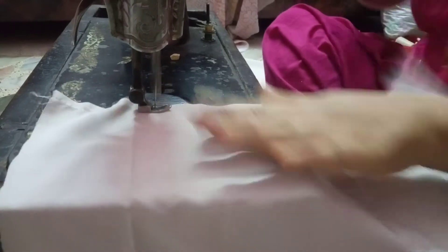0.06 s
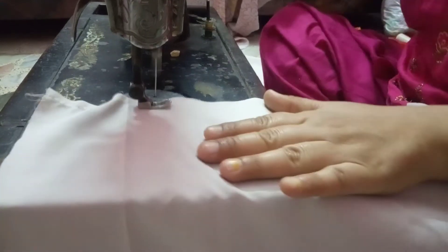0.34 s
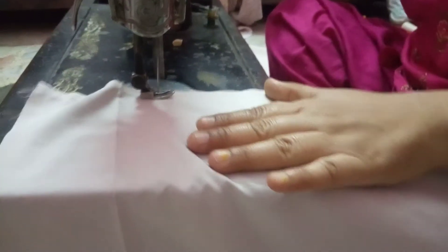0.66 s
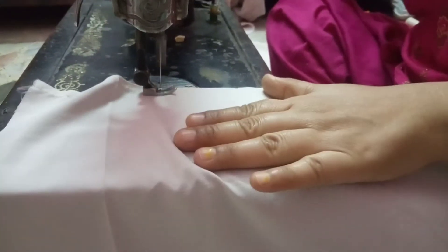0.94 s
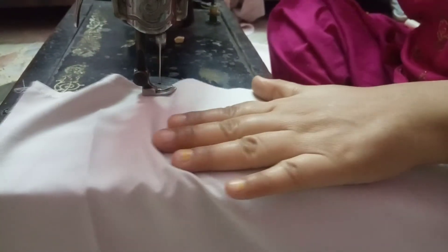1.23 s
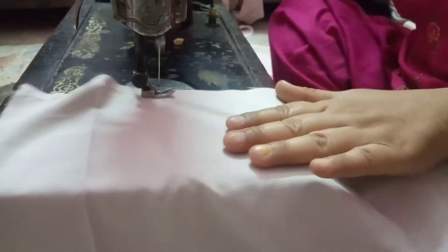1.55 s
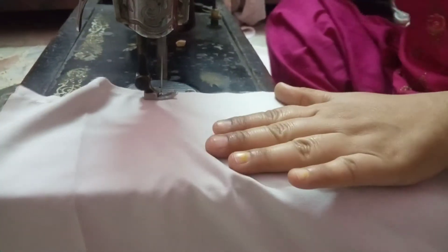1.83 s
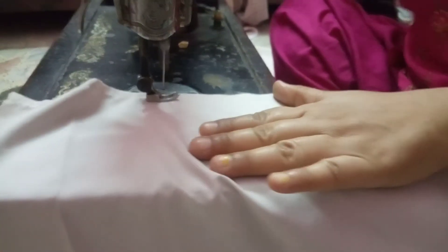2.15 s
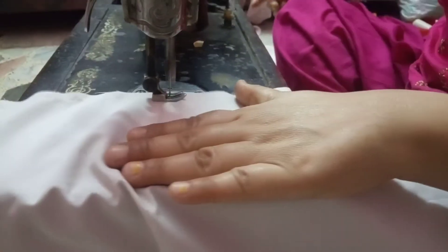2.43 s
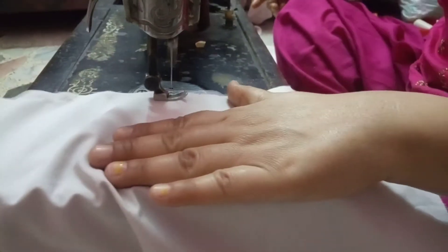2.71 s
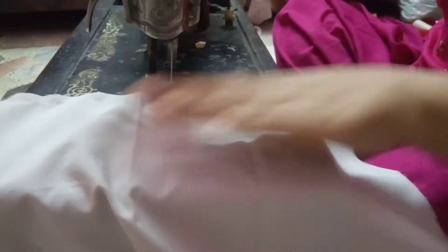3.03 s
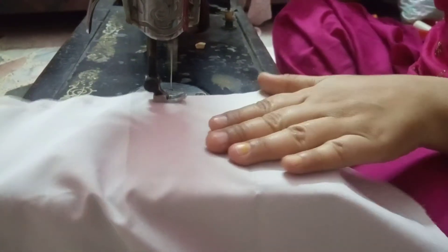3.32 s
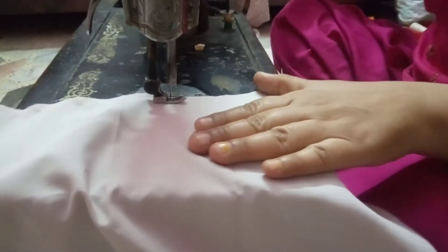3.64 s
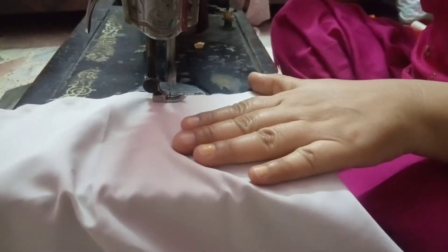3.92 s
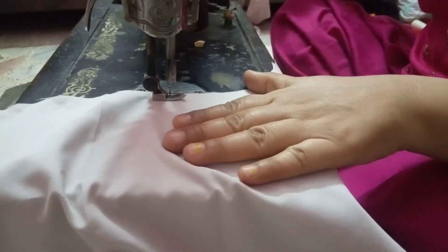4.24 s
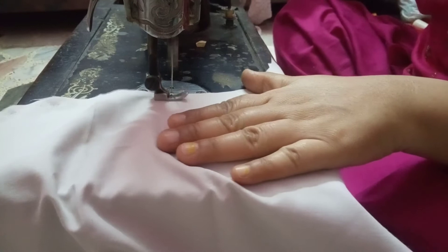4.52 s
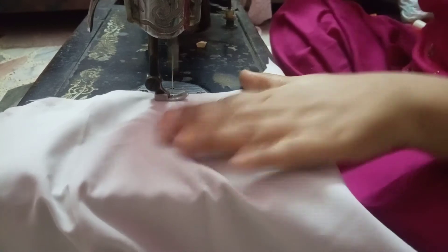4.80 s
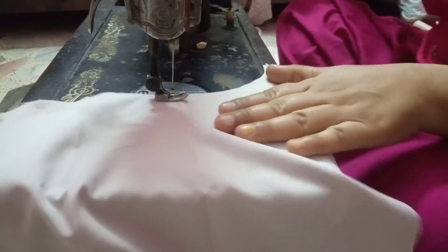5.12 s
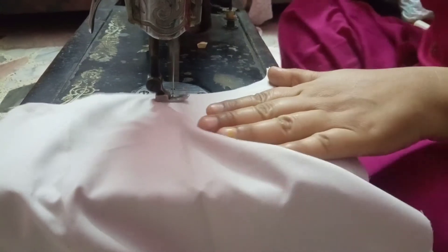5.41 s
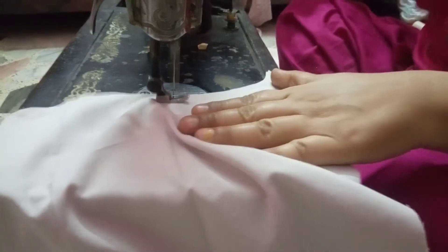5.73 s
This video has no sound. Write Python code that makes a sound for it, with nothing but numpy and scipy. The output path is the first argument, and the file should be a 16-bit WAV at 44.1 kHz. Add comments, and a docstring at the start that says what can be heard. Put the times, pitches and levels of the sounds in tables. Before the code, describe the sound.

An old iron sewing machine is already running, heard close by in a small room with a little reverberation. For about six seconds it ticks rapidly, around eight stitches a second, over a continuous rattle and the low rumble of its wooden table. Many stitches carry a light steel ping, and thin metallic chirps come and go. A clack with a high ring comes at about 1.1 seconds. The machine quickens toward 2 seconds, and the sound cuts out for an instant at 2.1, returning with a clack. The table thuds softly around 2.6 seconds, and another clack follows at 3. The pace eases between about 3.5 and 5 seconds, then picks up again. Hard clacks with a short metallic buzz land at about 4.7, 5.1 and 5.4 seconds. The table thuds again near 5.8 as the stitching continues.

```python
"""Ticking, rattling stitches of an old iron sewing machine on its wooden table, close by in a small room.
Each turn of the wheel plays one round of ticks and pings a steel part, often faintly. The works rumble
and rattle with the speed, thin metallic chirps come and go, the table thuds, and now and then a hard
clack sets the head buzzing. The sound cuts out once for a moment."""
import sys
import numpy as np
from scipy import signal
from scipy.fft import rfft, irfft
from scipy.io import wavfile
from scipy.ndimage import uniform_filter1d

SR = 44100
rng = np.random.default_rng(int(sys.argv[2]) if len(sys.argv) > 2 else 0)


def inscribe(sig):
    """Save sig as 16-bit PCM at rate SR to the path in sys.argv[1].

    A 1-D sig is mono; a 2-D sig holds one channel per row.
    Samples are clipped to [-1, 1] before scaling.
    """
    pcm = np.round(np.clip(np.atleast_2d(sig).T, -1, 1) * 32767)
    wavfile.write(sys.argv[1], SR, pcm.astype(np.int16))


N = 258426
TIME = np.arange(N) / SR
USUAL_TURNS_PER_S = 8

# one stitch per wheel turn: t/s, mid-turn lag/turn, tick force/dB, ping/dB
STITCHES = [(-0.085, 0.034, 5, -25), (0.041, 0, 0, -24), (0.1755, -0.042, -3, -0.5),
            (0.2977, -0.0057, -2, -0.5), (0.432, 0.033, -4.5, -24), (0.5561, 0.043, -0.5, -6),
            (0.7223, 0.043, -1.5, 0), (0.8954, 0.012, -0.5, -7.5), (1.0271, -0.013, -3, -2),
            (1.19, 0.012, 0, -17), (1.342, -0.019, -3, -28), (1.482, 0.017, -0.5, -20),
            (1.606, .016, 1, -18), (1.713, -0.024, 3.5, -24), (1.8282, -.02, -1.5, 2),
            (1.923, 0.025, 1, -15), (2.017, 0.0052, 2.5, -21), (2.116, 0, 3.5, -26), (2.2414, 0, -9, 0),
            (2.3361, 0.0017, -2, -1.5), (2.427, -.02, 2, -13), (2.5321, -0.039, -2.5, -0.5),
            (2.6299, 0.028, 3, 1.5), (2.742, -.005, 1, -16), (2.8594, -0.01, 0, -1),
            (2.9711, 0.014, 1, 1.5), (3.093, -0.014, 1, -16), (3.2221, -0.014, -0.5, -3),
            (3.3418, 0.025, 1, 2), (3.48, -0.012, 1, -17), (3.6212, -0.012, -1, 0),
            (3.7539, 0.0096, -2.5, -2.5), (3.905, 0, -1, -20), (4.0602, -0.011, 1.5, -1.5),
            (4.2248, -0.021, -1, -1), (4.385, -0.052, -0.5, -25), (4.593, -0.019, 2.5, -2),
            (4.75, 0.0015, 1, -36), (4.895, -0.0021, 0.5, -25), (5.04, .035, 3, -22),
            (5.172, 0.0054, 2, -20), (5.294, 0, 0.5, -29), (5.4076, -0.036, 5, 0.5), (5.523, .008, 3, -18),
            (5.626, 0.023, 3, -21), (5.7234, .025, 0.5, 3), (5.828, 0.0064, -6, -18), (5.93, 0, 0, -17)]
# hard clacks, relative levels: t/s, crack/dB, buzz/dB, buzz t60/s, buzz f/Hz, frame clang/dB,
# table thump/dB, splash/dB, ping/dB
CLACKS = [(1.1412, -37, -40.5, 0.34, 5570, -39, -44.5, -35, 6.5),
          (1.85, -28, -39, 0.26, 5750, -39, -62, -50, -15),
          (2.256, -33, -25, 0.051, 4960, -30, -32, -38.5, -23),
          (2.2726, -32, -31, 0.02, 5300, -38, -53, -50, -24),
          (3.057, -27, -44.5, 0.4, 4670, -47, -62, -54, -22),
          (4.6501, -26, -41.5, 0.31, 6000, -43, -41.5, -48, -23),
          (5.0613, -18.5, -41, 0.43, 5900, -45.5, -53, -49, -23),
          (5.4399, -15.5, -38, 0.51, 5350, -44.5, -49, -52, -20)]
# spectra of table rumble and bright snap: f/Hz, level/dB
RUMBLE_SPECTRUM = [(50, -46.5), (95, -20.5), (125, -0.5), (200, 2.5), (290, -2.5), (380, -1.5), (620, -5),
                   (850, -19.5), (1500, -14.5), (4000, -59.5)]
SNAP_SPECTRUM = [(4000, -30.5), (8000, 3.5), (11500, 9.5), (14000, 0.5), (16000, -1.5)]


def amp(db):
    return 10 ** (np.asarray(db) / 20)


def unit_rms(x):
    return x / np.sqrt(np.mean(x ** 2) + 1e-20)


def log_interp(points, hz):
    """Interpolate (f/Hz, value) points over log frequency."""
    f, value = np.transpose(points)
    return np.interp(np.log(hz + 1), np.log(f), value)


def add(mix, start_s, sound):
    part = mix[max(round(start_s * SR), 0):][:len(sound)]
    part += sound[:len(part)]


def decay(t, t60_s):
    return np.exp(-np.log(1000) * t / np.maximum(t60_s, 1e-4))


def through_frame(x, spectrum, size=8192):
    """Minimum-phase, unit-energy filter: the spectrum plus resonances of table and cast frame."""
    resonances = [(117, 20, 2), (156, 16.5, 5.5), (273.6, 39, 10), (459, 75, 3.5), (636.5, 59, 6.5),
                  (1172, 12, 4.5), (1465, 34, 4.5), (1950, 50, 1.5), (2310, 400, 2.5), (3263, 115, 5.5),
                  (3748, 86, 6), (5360, 40, 2.5), (5520, 350, -5), (6270, 72, 3.5)]  # f/Hz, width/Hz, lift/dB
    hz = np.fft.rfftfreq(size, 1 / SR)
    lift_db = sum(db / (1 + (2 * (hz - f) / width) ** 2) for f, width, db in resonances)
    cepstrum = irfft(np.log(amp(log_interp(spectrum, hz) + lift_db)))[:size // 2]
    cepstrum[1:] *= 2
    response = irfft(np.exp(rfft(cepstrum, size)))[:size // 2]
    return signal.oaconvolve(x, response / np.linalg.norm(response))[:N]


def bursts(times_s, levels_db, t60_s, pitch_hz=0, rise_s=0.00014, q=4.9):
    """Metal chatters on metal: a dying noise burst per blow, through a resonance if pitched."""
    t = TIME[:SR // 3 if np.max(t60_s) > 0.07 else SR // 16]
    out = np.zeros(N)
    for start_s, db, t60, hz in np.broadcast(times_s, levels_db, t60_s, pitch_hz):
        envelope = decay(t, t60) * np.minimum(t / rise_s, 1)
        burst = envelope * rng.standard_normal(len(t))
        if hz:
            burst = signal.lfilter(*signal.iirpeak(hz, q, SR), burst)
        add(out, start_s, amp(db) * burst * np.linalg.norm(envelope) / np.linalg.norm(burst))
    return out


def grains(per_s, spread_db, t60_s):
    """Noise of many small, uneven, overlapping blows; rms 1."""
    hits = rng.random(N) < per_s / SR
    blows = hits * amp(spread_db * np.minimum(rng.exponential(1, N), 3))
    power = signal.lfilter([1], [1, -decay(1 / SR, t60_s) ** 2], blows ** 2)
    return unit_rms(np.sqrt(power) * rng.standard_normal(N))


def flutter(count, depth, smooth_samples=260):
    """A ringing tone wavers in level and phase: one row of complex gain per mode."""
    noise = rng.standard_normal((2, count, SR // 4))
    drift = uniform_filter1d(uniform_filter1d(noise, smooth_samples), smooth_samples)
    return (1 + depth * (unit_rms(drift[0]) + 1j * unit_rms(drift[1]))) / np.sqrt(1 + 2 * depth ** 2)


def wheel():
    """Turns so far, and speed in doublings above the usual."""
    turns = np.interp(TIME, np.transpose(STITCHES)[0], np.arange(len(STITCHES)))
    turns_per_s = uniform_filter1d(np.gradient(turns) * SR, size=3000)
    return turns, np.log2(np.maximum(turns_per_s, 1) / USUAL_TURNS_PER_S)


def works(shake_above_per_s=8.05):
    """Shafts and loose joints, louder with speed: drone and rumble in the table, rattle and sizzle."""
    level_drift = [(0, 1.5, 7), (.15, 0.5, 0.5), (.55, 1, 1.5), (.95, -1, 0), (1.3, -2.5, 0.5), (1.7, 0, 0),
                   (2.0, 0, 2.5), (2.4, 3.5, 3), (3.0, 0, 0), (3.35, 0, 2), (3.7, -0.5, -.5),
                   (4.3, -1, 1.5), (4.56, -1, -0.5), (4.9, -2, -2), (5.3, 2, 0), (5.6, 0, 2),
                   (5.86, 2.5, 7.5)]  # t/s, drone and rumble/dB, rattle and sizzle/dB
    rattle_in_turn = [(.05, 0), (.2, -2), (.35, -0.9), (.55, 1), (.68, -1.5), (.82, -1.5), (.94, -2)]  # position/turn, level/dB
    # f/Hz, level/dB
    drone_spectrum = [(20, -38), (45, -33), (70, -8), (95, -2), (120, 5.5), (150, -6), (300, -60)]
    rattle_spectrum = [(300, -19), (700, 0), (1100, 2), (1700, 1), (2800, -2), (4500, 0), (6700, 0),
                       (8000, -9.5), (10000, -20), (16000, -38)]
    sizzle_spectrum = [(4000, -41), (8000, -30), (9500, 18), (12000, 8), (14000, 11.5), (16000, 2)]
    turns, doublings = wheel()
    drift_s, *drifts_db = np.transpose(level_drift)
    low_db, high_db = (np.interp(TIME, drift_s, db) for db in drifts_db)
    high_db += np.interp(turns, *np.transpose(rattle_in_turn), period=1)
    shake_db = 33.5 * np.maximum(doublings - np.log2(shake_above_per_s / USUAL_TURNS_PER_S), 0)
    drone = through_frame(grains(per_s=100, spread_db=1, t60_s=0.041), drone_spectrum)
    rumble = through_frame(grains(per_s=320, spread_db=1, t60_s=0.059), RUMBLE_SPECTRUM)
    rattle = through_frame(grains(per_s=450, spread_db=2, t60_s=0.035), rattle_spectrum)
    sizzle = through_frame(grains(per_s=300, spread_db=5.5, t60_s=0.028), sizzle_spectrum)
    return (amp(-71.5 + 5.2 * doublings + low_db + shake_db) * drone
            + amp(-52.5 + 6.9 * doublings + low_db) * rumble
            + amp(-51 + 5.2 * doublings + high_db) * rattle
            + amp(-69.5 + 8 * doublings + high_db) * sizzle)


def turn_ticks(db_per_doubling=5, jitter_turns=0.002, spread_db=1.0, pitch_spread=0.27):
    """Tick rows of needle bar and feed: one round stretched to each turn, harder when quick."""
    tick_round = [(.11, -36, -49, -69, 1290), (.31, -30.5, -43.5, -45.5, 1300),
                  (.47, -32, -49.5, -53, 2010), (.56, -40, -53, -51.5, 1550),
                  (.79, -33.5, -46, -49.5, 1490)]  # position/turn, click/dB, knock/dB, snap/dB, knock f/Hz
    rows = []
    for (start_s, lag, force_db, _), (end_s, *_) in zip(STITCHES, STITCHES[1:]):
        turn_s = end_s - start_s
        speed_db = -db_per_doubling * np.log2(turn_s * USUAL_TURNS_PER_S)
        for position, click_db, knock_db, snap_db, hz in tick_round:
            late, size, pitch = rng.standard_normal(3)
            tick_s = start_s + turn_s * (position + lag * np.sin(np.pi * position) + jitter_turns * late)
            db = force_db + speed_db + spread_db * size
            knock_hz = hz * np.exp(pitch_spread * pitch)
            if tick_s > 0:
                rows.append((tick_s, click_db + db, knock_db + db, snap_db + db, knock_hz))
    return rows


def ticks(contact_s=0.0006):
    """Needle bar, feed and loose linkages strike: a click, a hollow knock and a bright snap each."""
    # loose linkages, relative levels: t/s, click/dB, knock/dB, snap/dB, knock f/Hz
    stray_knocks = [(0.0074, -26.5, -43, -57.5, 2360), (0.3862, -26.5, -38, -55, 1550),
                    (0.5066, -31, -38, -49, 1010), (0.5394, -30.5, -46, -46, 886),
                    (0.832, -37, -48, -48, 1700), (0.912, -36.5, -49, -44, 1190),
                    (1.8003, -27, -38.5, -57, 947), (2.0042, -36, -33.5, -55, 1060),
                    (2.3532, -22.5, -51, -47, 1170), (2.3955, -21.5, -43, -53, 1750),
                    (2.709, -24.5, -41.5, -53, 2160), (3.4393, -25.5, -41, -45, 1570),
                    (3.859, -24.5, -41.5, -45, 1530), (4.018, -33.5, -46, -47, 1120),
                    (4.3297, -28, -44, -55, 2240), (5.2797, -53, -35.5, -68, 1000),
                    (5.37, -35, -34.5, -48, 1480), (5.7649, -20.5, -35.5, -45, 1540),
                    (5.814, -28.5, -34, -55, 1010)]
    # f/Hz, level/dB
    click_spectrum = [(1500, -24.5), (3000, -2.5), (4200, 4.5), (6700, 5.5), (8500, -9), (14000, -29)]
    knock_spectrum = [(150, -19.5), (500, 3), (1000, 2), (2400, 4.5), (3500, 7.5), (7000, -27)]
    times_s, click_db, knock_db, snap_db, knock_hz = np.transpose(turn_ticks() + stray_knocks)
    click = bursts(times_s + contact_s, click_db - 8, t60_s=0.018)
    knock = bursts(times_s, knock_db - 4.5, t60_s=0.031, pitch_hz=knock_hz, rise_s=0.0014)
    snap = bursts(times_s + contact_s, snap_db - 0.5, t60_s=0.017)
    return (through_frame(click, click_spectrum) + through_frame(knock, knock_spectrum)
            + through_frame(snap, SNAP_SPECTRUM))


def chirps(rise_s=0.0049, ring_t60_s=0.024, detune=0.0031):
    """Thin metallic chirps, and one high ring after the first clack: wavering modes hold, then die."""
    events = [(0.02, 0.041, -53, "rod"), (.35, 0.034, -53.5, "link"), (.595, 0.069, -55.5, "rod"),
              (1.011, 0.024, -51, "rod"), (1.135, .06, -46, "rod"), (1.321, 0.032, -51.5, "rod"),
              (1.594, 0.026, -47, "link"), (1.738, 0.015, -42.5, "rod"), (3.151, 0.012, -44, "link"),
              (3.245, .028, -49, "link"), (3.94, 0.014, -54, "rod"), (4.403, 0.02, -53.5, "rod"),
              (4.916, 0.031, -55, "link")]  # t/s, length/s, level/dB, part
    part_modes = {"rod": [(4675, -5.5), (8970, 1.5), (14430, -14)], "link": [(4830, -2), (8160, -1.5),
                  (9310, -2), (13165, -18.5), (14960, -10)]}  # per part: f/Hz, level/dB
    t, out = TIME[:SR // 4], np.zeros(N)
    for start_s, length_s, db, part in events:
        hz, mode_db = np.transpose(part_modes[part])[:, :, None]
        waver = flutter(len(hz), depth=0.8, smooth_samples=90)
        tuned_hz = hz * (1 + detune * rng.standard_normal())
        modes = waver * np.exp(2j * np.pi * tuned_hz * t)
        envelope = np.minimum(t / rise_s, 1) * decay(np.maximum(t - length_s, 0), ring_t60_s)
        add(out, start_s, envelope * (amp(db + mode_db) * modes.real).sum(0))
    return out


def pings(detune=0.0013, spread_db=2.7, contact_s=0.00067):
    """A steel part, struck as a turn begins or a clack lands, rings on with a slight chatter."""
    steel_modes = [(5055, 0, .45), (6342, -4, .25), (6379, -2, .33), (8965, -1, .33), (9025, -5, .22),
                   (9500, -12, .2), (10073, 0, .27), (11225, -9, .2), (13300, 0, .19), (13395, -4, .2),
                   (14080, -7, .19), (14750, -6, .17), (15150, -8, .15)]  # f/Hz, level/dB, t60/s
    # f/Hz, level/dB
    mode_drive = [(5055, -49.5), (6360, -46), (8990, -51), (10073, -50), (13300, -55)]
    strike_spectrum = [(800, -23), (2500, -7.5), (4000, 6.5), (6500, 3), (8000, -1.5), (10000, 0),
                       (14000, -7.5), (16000, -19)]
    times_s, ping_db = np.transpose([(row[0], row[-1]) for row in STITCHES + CLACKS if row[0] > 0])
    hz, mode_db, t60_s = np.transpose(steel_modes)[:, :, None]
    strike = bursts(times_s + contact_s, ping_db - 35, t60_s=0.02)
    snap = bursts(times_s + contact_s, ping_db - 44.5, t60_s=0.014)
    t, ring = TIME[:SR // 4], np.zeros(N)
    for start_s, db in zip(times_s, ping_db):
        size, shift, phase = rng.standard_normal((3, len(hz), 1))
        gains = amp(db + log_interp(mode_drive, hz) + mode_db + spread_db * size)
        cycles = hz * (1 + detune * shift) * t + phase
        modes = decay(t, t60_s) * flutter(len(hz), depth=0.38) * np.exp(2j * np.pi * cycles)
        add(ring, start_s + contact_s, (gains * modes.real).sum(0))
    chatter = bursts(times_s, ping_db - 49.5, t60_s=0.2)
    return through_frame(strike + chatter, strike_spectrum) + through_frame(snap, SNAP_SPECTRUM) + ring


def thuds(rise_s=0.0046):
    """The jolted table top swings a few times."""
    jolts = [(.28, -56, 79.4, 0.13), (2.544, -28, 250, 0.054), (2.647, -29, 258, 0.049),
             (3.249, -42, 88, 0.11), (5.75, -26.5, 278, 0.049), (5.769, -43, 128, 0.25),
             (5.852, -36, 252, 0.09)]  # t/s, level/dB, f/Hz, t60/s
    t, out = TIME[:SR // 3], np.zeros(N)
    for start_s, db, hz, t60_s in jolts:
        envelope = np.minimum(t / rise_s, 1) * decay(t, t60_s)
        add(out, start_s, amp(db) * envelope * np.sin(2 * np.pi * hz * t))
    return out


def clacks():
    """A hard, short crack jolts frame and table and leaves the loose plates of the head buzzing."""
    # f/Hz, level/dB
    buzz_spectrum = [(1000, -20.5), (2800, -10.5), (4400, -4.5), (5300, 6), (5900, 2.5), (7000, -2.5),
                     (8000, -10), (10000, -29.5), (15000, -50.5)]
    clang_spectrum = [(380, -18), (600, -11), (850, -9.5), (1150, -6.5), (1370, 7.5), (1800, -5.5),
                      (2600, 2.5), (3800, -7.5), (6000, -26)]
    times_s, crack_db, buzz_db, t60_s, buzz_hz, clang_db, thump_db, splash_db, _ = np.transpose(CLACKS)
    crack = bursts(times_s, crack_db + 5, t60_s=0.006, pitch_hz=buzz_hz, rise_s=0.002, q=1.6)
    buzz = bursts(times_s, buzz_db, t60_s, buzz_hz, q=1.8)
    buzz *= grains(per_s=2700, spread_db=1, t60_s=0.02)
    clang = through_frame(bursts(times_s, clang_db, 0.63 * t60_s), clang_spectrum)
    thump = through_frame(bursts(times_s, thump_db, 0.79 * t60_s), RUMBLE_SPECTRUM)
    splash = through_frame(bursts(times_s, splash_db + 3, t60_s=0.044), SNAP_SPECTRUM)
    return through_frame(crack + buzz, buzz_spectrum) + clang + thump + splash


def room(x, size=16384, rise_s=0.00073):
    """Small room: a short diffuse tail, longest in the midrange."""
    decay_times = [(150, 0.21), (1000, 0.47), (5000, 0.37), (15000, 0.27)]  # f/Hz, t60/s
    hz, t, noise = signal.stft(rng.standard_normal(size), SR, nperseg=256)
    t60_s = log_interp(decay_times, hz)[:, None]
    _, tail = signal.istft(noise * decay(t, t60_s), SR, nperseg=256)
    tail *= np.minimum(TIME[:len(tail)] / rise_s, 1)
    return signal.oaconvolve(x, tail / np.linalg.norm(tail))[:N]


def scene():
    """The machine close by, with a little of the room."""
    impacts = ticks() + clacks()
    ringing = pings() + chirps()
    reflected = amp(-8.5) * room(impacts + amp(-1.5) * ringing)
    return (works() + thuds() + impacts + ringing + reflected)[None]


def record(dry):
    """A brief dropout, then a low-pass."""
    gap_start_s, gap_end_s, cutoff_hz = 2.121, 2.237, 16000
    live = (TIME < gap_start_s) | (TIME > gap_end_s)
    low_pass = signal.firwin(301, cutoff_hz, window=("kaiser", 8), fs=SR)
    return signal.oaconvolve(dry * live, low_pass[None], "same")


dry = scene()
out = record(dry)
inscribe(out)
```